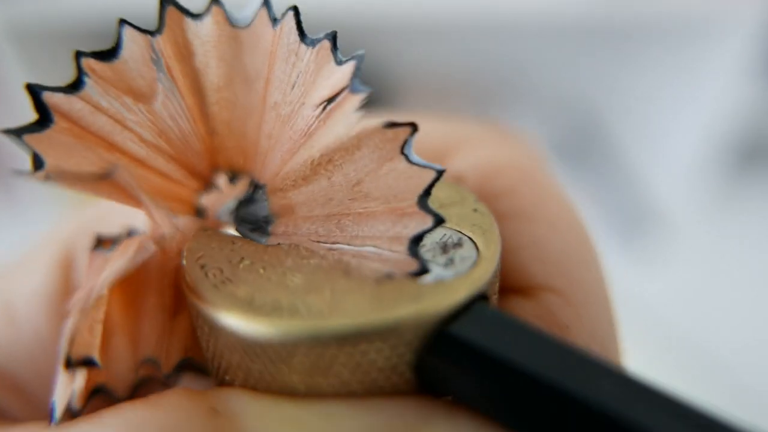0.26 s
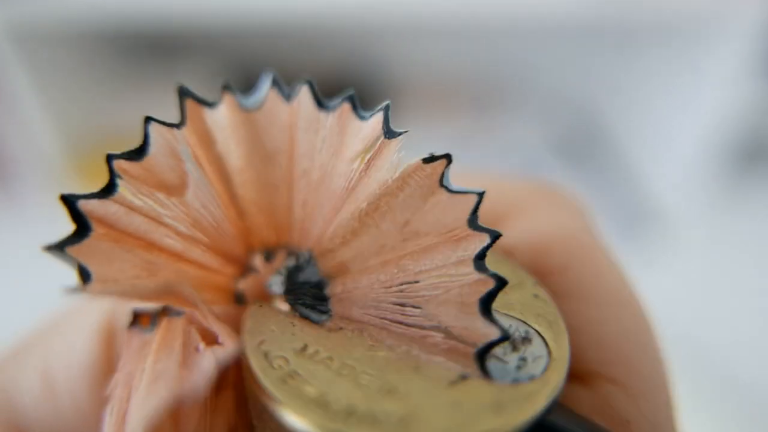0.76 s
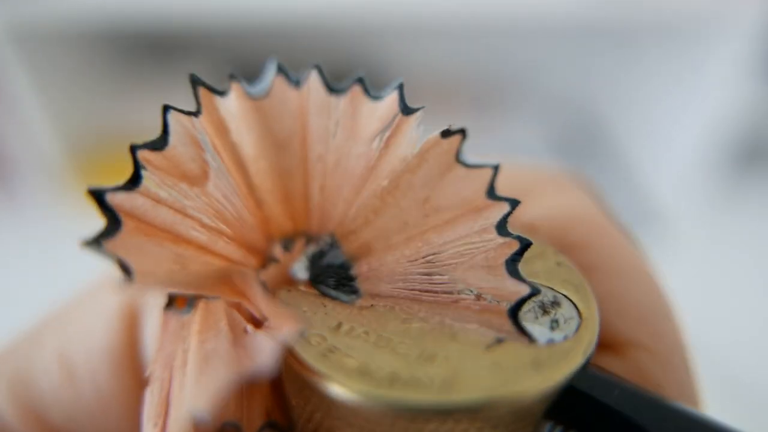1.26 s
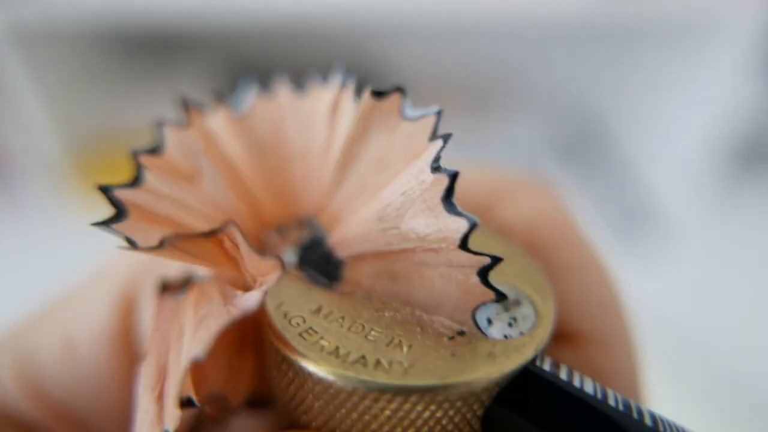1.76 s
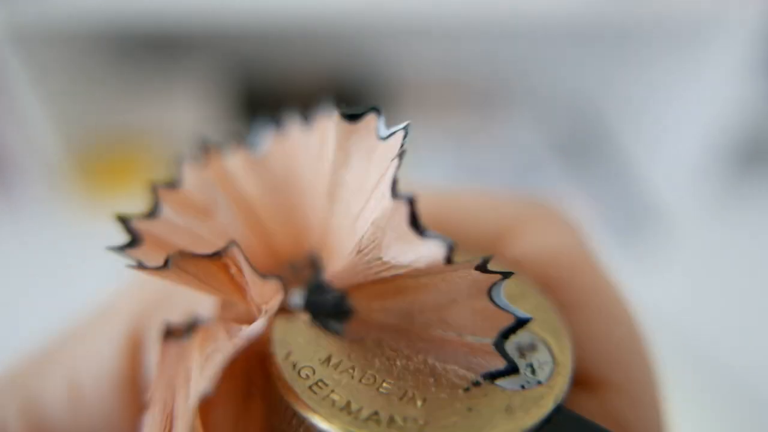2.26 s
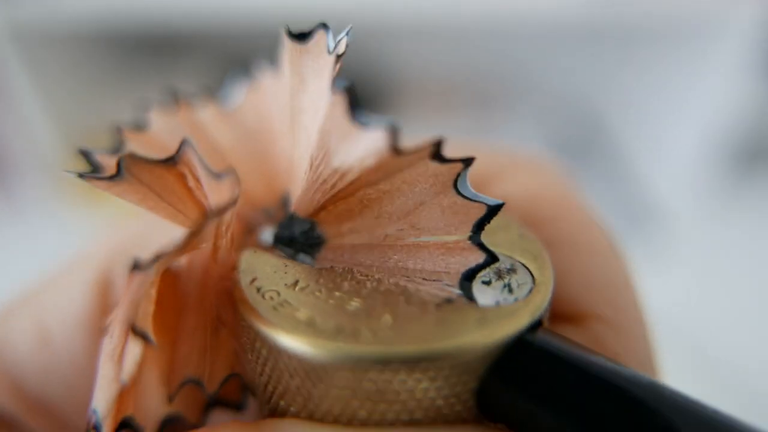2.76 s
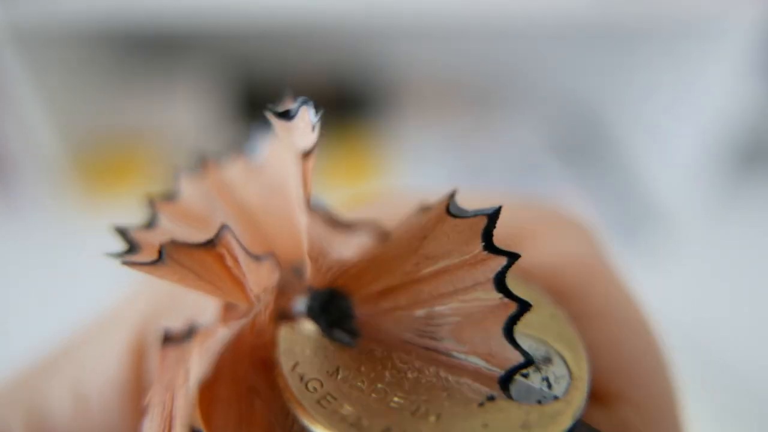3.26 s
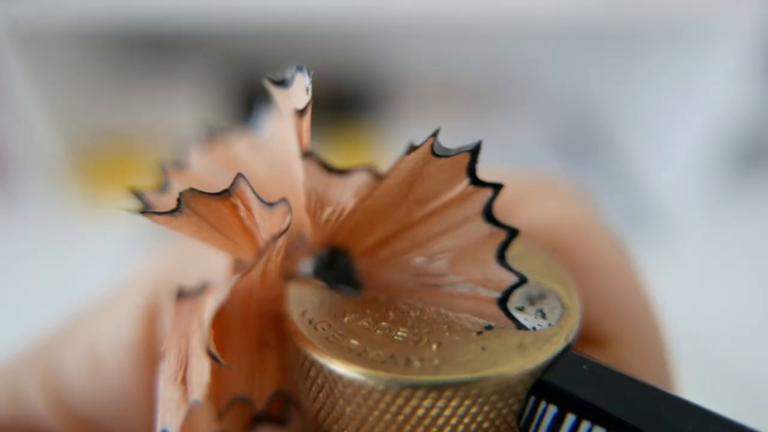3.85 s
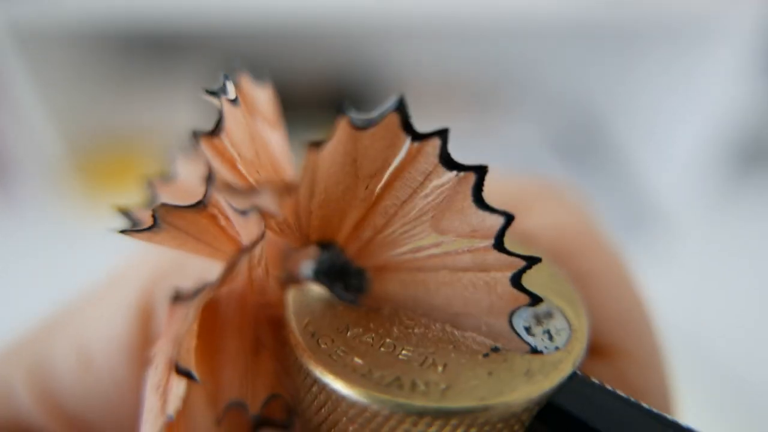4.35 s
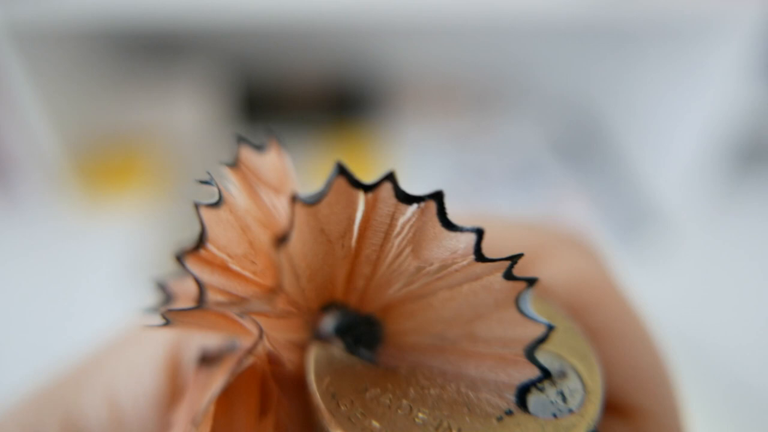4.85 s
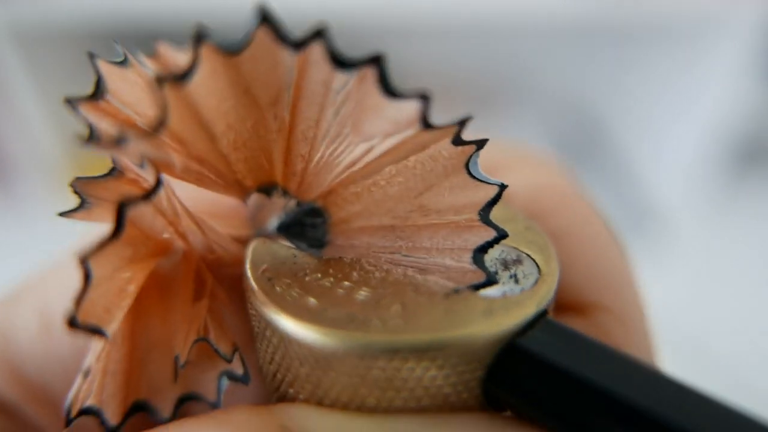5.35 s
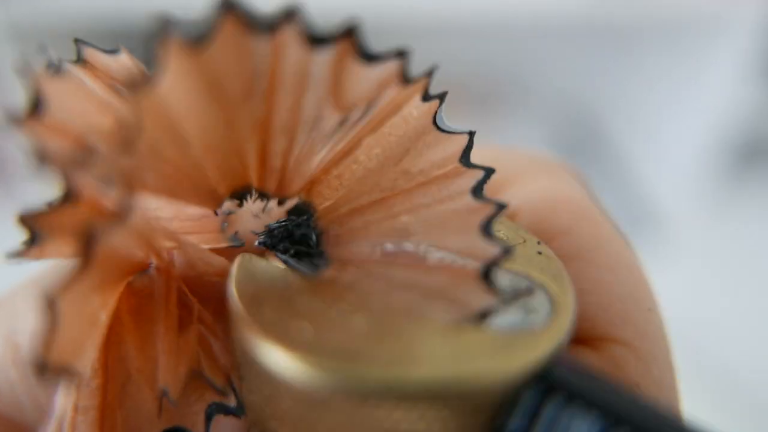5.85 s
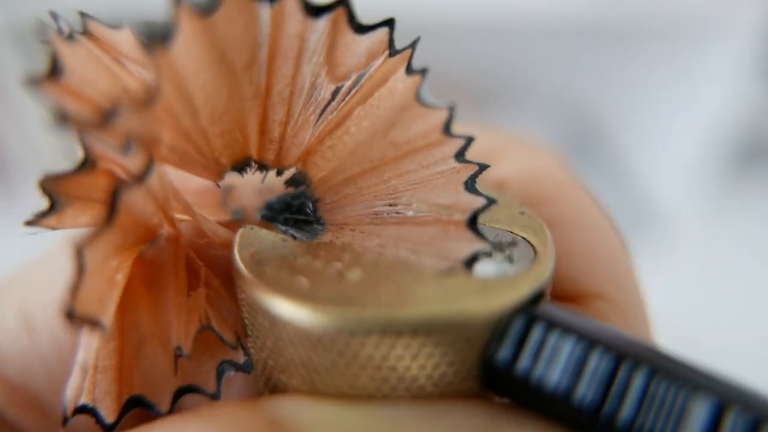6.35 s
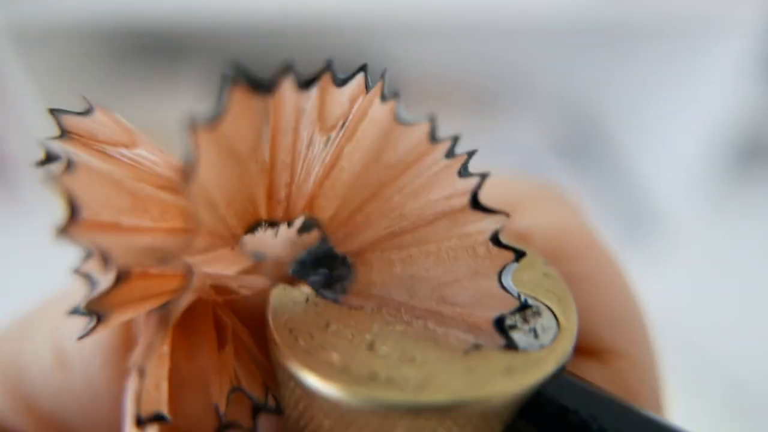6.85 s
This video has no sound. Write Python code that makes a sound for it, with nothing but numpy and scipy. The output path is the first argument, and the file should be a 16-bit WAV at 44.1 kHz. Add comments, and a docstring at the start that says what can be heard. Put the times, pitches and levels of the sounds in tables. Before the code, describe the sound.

In a quiet small room, a blade shaves a wooden pencil in separate wrist twists, a little under a second apart. Each scrape bites, tears through crackling fibres, sticks briefly and eases off, the curled shaving snapping and rustling. There is one tiny squeak early on, light ticks and low handling knocks between strokes, including a quick even run of four. Close microphone, faint steady low hum and thin hiss.

```python
"""Low ventilation hum and faint hiss run throughout: filtered noise. The tail of a twist comes first.
From 0.6 s a pencil is twisted eight times in a small brass sharpener close by: the blade bites, tears a
dense stream of fibre clicks, often stalls, eases off. The shaving snaps in noise bursts and rustles in
narrow bands; the wood squeaks once near 2.2 s; a desk and small room answer. Dry modal ticks fall between
twists and dull modal knocks throughout, with an even run of four from 5.1 s; a last knock at 7 s."""
import sys
import numpy as np
from scipy import signal
from scipy.fft import rfft, irfft, next_fast_len
from scipy.io import wavfile
from scipy.ndimage import uniform_filter1d, map_coordinates

SR = 44100
rng = np.random.default_rng(int(sys.argv[2]) if len(sys.argv) > 2 else 0)


def transcribe(u):
    """Save the signal u as a 16-bit wav file named by the first command-line argument.

    u: samples, shape (n,) or (channels, n), limited to [-1, 1]; the rate is SR.
    q: integer samples, one column per channel.
    """
    v = np.clip(np.atleast_2d(u).T, -1, 1)
    q = np.round(v * 32767).astype(np.int16)
    wavfile.write(sys.argv[1], SR, q)


N = 313551


def amp(db):
    """Decibels to gain."""
    return 10 ** (np.asarray(db) / 20)


def unit(x):
    """Scale to rms 1."""
    return x / np.sqrt(np.mean(x ** 2) + 1e-20)


def along(points, hz):
    """Interpolate (frequency_hz, value) points on a log frequency axis."""
    point_hz, value = np.transpose(points)
    return np.interp(np.log(hz + 1), np.log(point_hz), value)


def wobble(knots_per_s):
    """Smooth random curve through normally distributed knots."""
    knots = rng.standard_normal(int(N * knots_per_s / SR) + 4)
    return map_coordinates(knots, [np.arange(N) * knots_per_s / SR])


def stereo_noise(count=N):
    """Two unrelated channels of white noise."""
    return rng.standard_normal((2, count))


def filtered(x, response):
    """Multiply the spectrum of x by a function of frequency."""
    size = next_fast_len(N + SR // 2)
    return irfft(rfft(x, size) * response(np.fft.rfftfreq(size, 1 / SR)), size)[..., :N]


def colour(points, size=1024):
    """Minimum-phase impulse response of energy 1 with the given spectrum shape."""
    cepstrum = irfft(np.log(amp(along(points, np.fft.rfftfreq(size, 1 / SR)))))
    # fold the cepstrum to make the response causal
    cepstrum[1:size // 2] *= 2
    cepstrum[size // 2 + 1:] = 0
    response = irfft(np.exp(rfft(cepstrum)))
    return response / np.linalg.norm(response)


def through(x, response):
    """Convolve channels with an impulse response."""
    return signal.oaconvolve(np.atleast_2d(x), np.atleast_2d(response), axes=1)[:, :N]


def spread(pair, side_db):
    """Two unrelated signals become left and right: one shared, one opposed."""
    side = amp(side_db) * pair[1]
    return np.array([pair[0] + side, pair[0] - side])


def add(track, start_s, sound):
    """Mix a sound into a track, in place."""
    start = max(round(start_s * SR), 0)
    part = track[..., start:start + sound.shape[-1]]
    part += sound[..., :part.shape[-1]]


def ring(modes, attack_s, side_db):
    """One blow on decaying modes of random phase and slightly varied strength; stereo, peak near 1."""
    t = np.arange(SR // 10) / SR
    pair = 0
    for hz, level_db, t60_s in modes:
        decay = amp(level_db + rng.normal(0, 1, (2, 1)) - 60 * t / t60_s)
        pair = pair + decay * np.sin(2 * np.pi * (hz * t + rng.random((2, 1))))
    pair = pair * (1 - np.exp(-t / attack_s))
    pair /= np.linalg.norm(pair, axis=1, keepdims=True)
    return spread(pair * np.sqrt(SR / 2000), side_db)


def patchy(x, depth_db):
    """Shifting resonances, some hundred Hz wide and tens of ms long, colour a stereo sound; rms 1."""
    z = signal.stft(x, nperseg=512)[2]
    field = rng.standard_normal(z.shape[1:])
    field = uniform_filter1d(field, size=7, axis=0)
    field = uniform_filter1d(field, size=8, axis=1)
    return unit(signal.istft(z * amp(depth_db * unit(field)), nperseg=512)[1][:, :N])


# ventilation hum bands: centre_hz, width_hz, level_db
HUM = [(115.2, 4, -76.5), (130.6, 5.2, -70.5), (173.5, 8.3, -68), (205.8, 8.3, -64.5), (245.3, 5, -60.5),
       (262, 5.9, -65), (263.8, 14, -68), (353, 13.8, -65.5), (465, 8.2, -76.5)]
# rumble spectrum shared by both channels: frequency_hz, density_db (relative, per Hz)
RUMBLE = [(25, -42.5), (65, -27), (100, -11), (125, -5), (160, 4), (260, 0.5), (310, -2.5), (450, -6),
          (700, -16), (1200, -40.5), (2500, -62)]
# rumble spectrum opposed between channels: frequency_hz, density_db (relative, per Hz)
RUMBLE_SIDE = [(30, -49), (120, -29), (250, -9.5), (500, -12), (800, -10.5), (1200, -10), (2000, -18),
               (3200, -62)]
# hiss spectrum: frequency_hz, density_db (relative, per Hz)
HISS = [(200, -2.5), (600, 7.5), (1200, -1), (2200, -1), (3000, -3.5), (4200, -5.5), (6000, -4.5),
        (8000, -7), (10000, -5), (12000, -8.5), (14000, -10.5), (15500, -12.5), (16200, -44)]


def ventilation(rumble_db=-58, hiss_db=-61):
    """Narrow noise bands make a wavering hum, in broad rumble and thin steady hiss."""
    def hum_bands(f):
        power = 0
        for hz, width_hz, level_db in HUM:
            skirt = (1 + ((f - hz) / width_hz) ** 2) ** 2
            power = power + amp(level_db) ** 2 * SR / (np.pi * width_hz) / skirt
        return np.sqrt(power)

    hum = filtered(spread(stereo_noise(), side_db=-27.0), hum_bands)
    rumble_pair = filtered(stereo_noise(), lambda f: amp([along(RUMBLE, f), along(RUMBLE_SIDE, f)]))
    rumble = spread(rumble_pair, side_db=-1.5)
    hiss = filtered(spread(stereo_noise(), side_db=0.0), lambda f: amp(along(HISS, f)))
    return hum + amp(rumble_db) * unit(rumble) + amp(hiss_db) * unit(hiss)


# decay of the room's diffuse tail: frequency_hz, t60_s
ROOM = [(200, 0.4), (1500, 0.52), (6000, 0.3), (15000, 0.2)]


def room(x, desk_db=-8.5, wall_db=-20, tail_db=-8, build_s=0.0041):
    """Direct sound, scattered echoes from desk then nearby surfaces, and a short diffuse tail."""
    hz, t, z = signal.stft(stereo_noise(SR // 2), SR, nperseg=256)
    decay = amp(-60 * t / along(ROOM, hz)[:, None]) * (1 - np.exp(-t / build_s))
    tail = signal.istft(z * decay, SR, nperseg=256)[1]
    response = amp(tail_db) * tail / np.linalg.norm(tail[0])
    response[:, 0] += 1  # direct sound
    scatter = np.exp(-np.arange(32) / 4)
    for delay_s, echo_db in [(.00425, desk_db), (.013, wall_db), (.021, wall_db), (.031, wall_db)]:
        bounce = spread(stereo_noise(len(scatter)), side_db=1) * scatter
        add(response, delay_s, amp(echo_db) * np.sqrt(2) * bounce / np.linalg.norm(bounce))
    return through(x, response)


# dull knocks, single or in an even run: start_s, level_db (relative), count
KNOCKS = [(0.259, -40.5, 1), (0.559, -42, 2), (1.159, -47.5, 1), (1.874, -45, 1), (3.359, -42.5, 1),
          (4.763, -42, 1), (4.997, -38, 1), (5.13, -41.5, 4), (5.463, -40.5, 1), (5.963, -40.5, 1),
          (6.363, -40.5, 1), (7.032, -43.5, 1)]
# modes of a knock: frequency_hz, level_db (relative), t60_s
KNOCK_MODES = [(493, -1, 0.04), (593, -3, 0.031), (920, -6, 0.0078), (1083, -4.5, 0.025), (1380, 0, 0.0079),
               (2300, -7.5, 0.012), (3200, 8.5, 0.0026), (4650, -8.5, 0.014)]
KNOCK_STEP_S = .0665


def knocks(knock_db=1, rattle_db=-9, rattle_t60_s=0.016):
    """Modes ring nearly alike left and right; a brief noise rattle makes each knock different."""
    track, t = np.zeros((2, N)), np.arange(SR // 50) / SR
    for start_s, level_db, count in KNOCKS:
        for step in range(round(count)):
            rattle = rng.standard_normal(len(t)) * amp(-60 * t / rattle_t60_s)
            blow = (t == 0) + amp(rattle_db) * rattle / np.linalg.norm(rattle)
            knock = through(ring(KNOCK_MODES, attack_s=0.0008, side_db=-20), blow)
            add(track, start_s + step * KNOCK_STEP_S + 0.001014, amp(level_db + knock_db) * knock)
    return track


# light dry ticks between twists: start_s, level_db (relative), bright_db (relative to level_db)
TICKS = [(1.2305, -52.5, -7), (1.8142, -51.5, -8), (1.9543, -53, -6), (1.9954, -44.5, -6),
         (2.7995, -51, -14), (3.5124, -44.5, -3), (3.681, -45.5, -9), (3.706, -48.5, -11), (4.521, -45, -6),
         (5.1323, -46.5, -6), (6.0647, -43, -4.5), (6.2516, -49, -6), (6.9481, -47.5, -8)]
# main modes of a tick: frequency_hz, level_db (relative), t60_s
TICK_MODES = [(1580, -3.5, 0.0048), (2200, -3.5, 0.011), (2840, -2.5, 0.011), (3290, 2, 0.0045)]
# bright modes of a tick: frequency_hz, level_db (relative), t60_s
TICK_BRIGHT = [(4700, -11, 0.0055), (5870, -2, 0.0073), (6400, -6, .007), (6820, -3, 0.0069),
               (9000, -4, .004)]


def ticks(tick_db=-1, bright_gain_db=0):
    """Light dry ticks: short, heavily damped modes, with a separate bright part."""
    track = np.zeros((2, N))
    for start_s, level_db, bright_db in TICKS:
        tick = ring(TICK_MODES, attack_s=0.00039, side_db=-6)
        bright = ring(TICK_BRIGHT, attack_s=0.00046, side_db=-24)
        add(track, start_s + 0.001, amp(level_db + tick_db) * tick)
        add(track, start_s + 0.00095, amp(level_db + bright_db + bright_gain_db) * bright)
    return track


# brief squeak of the wood in the cone: centre_s, length_s, pitch_hz, level_db (relative)
SQUEAK = (2.2, .045, 2392, -57)


def squeak(waver_hz=18):
    """The rubbing locks for a moment into a wavering tone."""
    centre_s, length_s, pitch_hz, level_db = SQUEAK
    swell = np.exp(-(2 * (np.arange(N) / SR - centre_s) / length_s) ** 2)
    cycles = np.cumsum(pitch_hz + waver_hz * wobble(150)) / SR
    return amp(level_db) * swell * np.sin(2 * np.pi * cycles)


# rustles of the loose curl, mostly as a twist eases off: centre_s, band_hz, level_db (relative)
CURL = [(0.875, 5530, -61), (1.665, 9650, -62), (4.215, 5070, -63), (4.955, 10200, -54), (5.005, 5120, -60),
        (5.915, 5390, -56.5), (6.78, 5270, -62)]


def curl(length_s=0.037, width_hz=950, level_db=-1.5):
    """The thin fan of wood rustles: swells of narrow noise shifted up to each band."""
    t = np.arange(N) / SR
    narrow = spread(stereo_noise() + 1j * stereo_noise(), side_db=-19)
    narrow = signal.lfilter(*signal.butter(2, width_hz / 2, fs=SR), narrow)
    narrow /= narrow.real.std()
    track = np.zeros((2, N))
    for centre_s, band_hz, rustle_db in CURL:
        near = np.abs(t - centre_s) < 3 * length_s
        swell = np.exp(-((t[near] - centre_s) / length_s) ** 2)
        rustle = np.real(narrow[:, near] * np.exp(2j * np.pi * band_hz * t[near]))
        track[:, near] += amp(rustle_db + level_db) * swell * rustle
    return track


# spectrum of cracking wood, for chips and snaps: frequency_hz, density_db (relative, per Hz)
CRACK = [(300, -10.5), (1000, -15.5), (1700, -7), (4000, -8.5), (5300, -1.5), (8000, 2.5), (11000, 1),
         (14200, 1.5), (16500, -36)]


def chips(force, chips_per_s=90, scatter_db=3, t60_s=0.0036, level_db=-9):
    """Small splinters break off at random as decaying noise, louder the harder the blade cuts."""
    sizes = amp(scatter_db * np.clip(rng.standard_normal(N), -2, 2))
    breaks = (rng.random(N) < chips_per_s / SR) * sizes
    bursts = signal.lfilter([1], [1, -amp(-60 / (t60_s * SR))], breaks)
    crackle = through(bursts * spread(stereo_noise(), side_db=-2.5), colour(CRACK))
    return amp(level_db) * force * unit(crackle)


# loud cracks of the shaving: start_s, level_db (relative), pan_db (left minus right)
SNAPS = [(0.6236, -32, -5), (0.7624, -17, -3), (0.777, -26, -2), (0.823, -27.5, -2), (0.903, -32, -2.5),
         (1.063, -34, -5.5), (1.483, -31, -5), (1.53, -19.5, -7), (1.5608, -30.5, 3), (1.6013, -28, -4.5),
         (1.62, -21.5, -3), (2.1784, -36, 0), (2.273, -28, 3), (2.338, -18, -2), (3.117, -25.5, -8),
         (3.293, -24.5, -5), (3.3433, -29.5, -7), (3.3671, -32, -1), (4.1204, -31, -12), (4.1636, -27, -6),
         (4.347, -36.5, -6), (4.6914, -32, -5), (4.786, -33, -3), (4.876, -21.5, -5), (4.954, -30, -0.5),
         (4.9645, -24, -9), (5.7565, -24, -4), (5.789, -22, -4), (5.874, -12, -3.5), (6.5123, -30, -1.5),
         (6.586, -24, -4), (6.6513, -15.5, -1.5), (6.727, -26.5, -1)]


def snaps(splinter_db=-20, splinter_t60_s=0.018, crumble=0.5, sharpness=0.94, delay_s=0.0015, level_db=9.5):
    """One bright release, then a few ms of splintering; weak cracks mostly crumble."""
    track, t = np.zeros((2, N)), np.arange(SR // 25) / SR
    body = colour(CRACK)
    loudest_db = max(row[1] for row in SNAPS)
    for start_s, snap_db, pan_db in SNAPS:
        splinters = amp(splinter_db + crumble * (loudest_db - snap_db) - 60 * t / splinter_t60_s)
        burst = amp(-12 - 60 * t / 0.00094)
        release = spread(stereo_noise(len(t)), side_db=-8) * (splinters + burst)
        release[:, :2] += 1.04 * np.array([1, -sharpness])  # the wood springs back at once
        crack = through(release, body)
        crack /= np.linalg.norm(crack, axis=1, keepdims=True) * np.sqrt(2)
        pan = amp([[pan_db / 2], [-pan_db / 2]])
        add(track, start_s + delay_s, amp(snap_db + level_db) * pan * crack)
    return track


# resonances of the sharpener's slot and curled shaving: centre_hz, width_hz, gain_db
SLOT = [(5410, 260, -6), (6070, 150, -12), (7360, 120, -9.5), (8700, 71, -1), (10160, 400, -15)]


def slot(x):
    """Slot and shaving resonate along with the blade: band-pass peaks added to the direct sound."""
    def response(f):
        total = 1
        for hz, width_hz, gain_db in SLOT:
            damping = 1j * f * width_hz
            total = total + amp(gain_db) * damping / (hz * hz - f * f + damping)
        return total

    return filtered(x, response)


# twists of the wrist: start_s, length_s, level_db (relative), growth_db (over the twist), bite_db
TWISTS = [(0.0, 0.028, -45.5, -3, 2), (0.613, 0.28, -49, -2, -1), (1.402, 0.22, -52, 5, 9.5),
          (2.159, 0.26, -45, -4.5, 6), (3.104, 0.27, -47, -2.5, -2.5), (3.894, 0.3, -51.5, 4.5, 4),
          (4.683, 0.34, -46.5, -4.5, 2), (5.589, 0.32, -49, -0.5, 1), (6.433, 0.32, -57, 12.5, 0.5)]
# the force sags briefly in mid-twist: centre_s, half_length_s, depth_db
STALLS = [(0.864, 0.042, 5.5), (1.49, 0.053, 9), (2.244, 0.022, 13), (2.333, .008, 6), (3.334, 0.0086, 10),
          (4.024, 0.028, 11), (4.767, 0.026, 11), (4.852, 0.016, 10), (4.953, .007, 3), (5.837, 0.019, 3.5),
          (6.702, 0.02, 13)]
ATTACK_S, RELEASE_DB_PER_S = 0.016, 430
BITE_AT_S, BITE_S = 0.038, 0.014  # bite peak after the start, and its half width
TEAR_DB, TEAR_S = -29.5, 0.012  # tearing after a snap: relative to its table level, time constant


def effort(touch_db=-54, touch_s=0.0063, catch_db=5, catch_lead_s=0.0057, catch_s=0.0034):
    """Cutting force: touch, bite, hold, ease off; it dips as wood catches, and tears on after a snap."""
    t, force = np.arange(N) / SR, np.zeros(N)
    short_t = t[:SR // 4]

    def bell(centre_s, half_s):
        return np.exp(-((t - centre_s) / half_s) ** 2)

    sag_db = sum(depth_db * bell(centre_s, half_s) for centre_s, half_s, depth_db in STALLS)
    for start_s, length_s, level_db, growth_db, bite_db in TWISTS:
        age_s = t - start_s
        growth = growth_db * np.clip(age_s / length_s, 0, 1)
        hold_db = level_db + growth + bite_db * bell(start_s + BITE_AT_S, BITE_S)
        release_db = RELEASE_DB_PER_S * np.maximum(age_s - length_s, 0)
        force += np.clip(age_s / ATTACK_S, 0, 1) ** 2 * amp(hold_db - release_db)
        add(force, start_s, amp(touch_db) * np.exp(-short_t / touch_s))
    for start_s, snap_db, _ in SNAPS:
        sag_db += catch_db * bell(start_s - catch_lead_s, catch_s)
        add(force, start_s, amp(snap_db + TEAR_DB) * np.exp(-short_t / TEAR_S))
    return force * amp(-sag_db)


# spectrum of the cut: frequency_hz, density_db (relative, per Hz)
CUT = [(200, -36), (600, -5), (1200, -8), (2300, -4.5), (3600, -5.5), (4300, -14), (4900, 0.5), (5600, 1),
       (7600, -1), (10300, 1.5), (12000, -0.5), (14000, 0), (15400, -1.5), (16500, -28)]


def cutting(force, fibres_per_s=5000, size_db=4.0, rub_db=-5, judder_db=1.0, grain_db=2.0, patchy_db=3.17,
            bundles_per_s=70, bundle_db=3.5, bundle_life_s=0.0013, level_db=-4.0):
    """Fibres part under the blade as tiny clicks of uneven size, over the rub of wood on brass."""
    parting = rng.random((2, N)) < fibres_per_s / SR
    sizes = amp(size_db * np.clip(stereo_noise(), -2, 2))
    fibres = unit(parting * sizes * np.sign(stereo_noise()))
    stream = unit(fibres + amp(rub_db) * stereo_noise())
    # the shaving radiates the rasp, and its shape keeps changing as it grows
    rasp = patchy(through(spread(stream, side_db=-12.5), colour(CUT)), patchy_db)
    # the edge catches and slips on harder and softer wood
    catch = amp(judder_db * wobble(240) + grain_db * wobble(90))
    # now and then a whole bundle of fibres gives way at once
    bundles = (rng.random(N) < bundles_per_s / SR) * amp(bundle_db) * rng.uniform(0.57, 1, N)
    catch = catch + signal.lfilter([1], [1, -np.exp(-1 / (bundle_life_s * SR))], bundles)
    return amp(level_db) * force * catch * rasp


def scene(right_db=1.38, ticks_right_db=2.2, air_right_db=0.4):
    """Sum all layers, with the sharpener held a little to the right."""
    def rightward(db):
        return amp([[-db], [db]])

    force = effort()
    scrape = (cutting(force) + chips(force) + curl() + squeak()) * rightward(right_db)
    blade = room(slot(scrape + snaps()))
    ticking = room(ticks(), desk_db=-5, wall_db=-22, tail_db=-12) * rightward(ticks_right_db)
    return blade + ticking + knocks() + ventilation() * rightward(air_right_db)


TOP_HZ = 16200


def record(dry):
    """Steep low-pass at the band limit."""
    return filtered(dry, lambda hz: 1 / np.sqrt(1 + (hz / TOP_HZ) ** 160))


dry = scene()
out = record(dry)
transcribe(out)
```